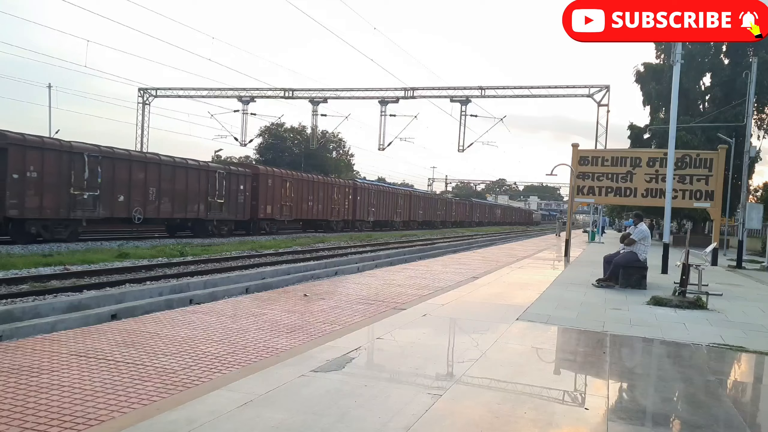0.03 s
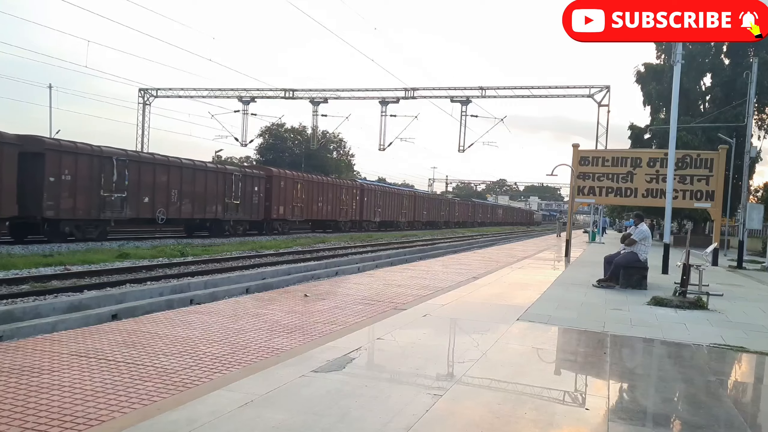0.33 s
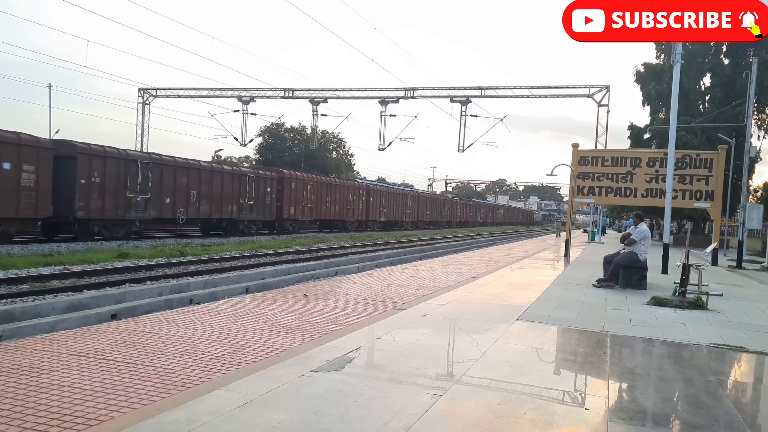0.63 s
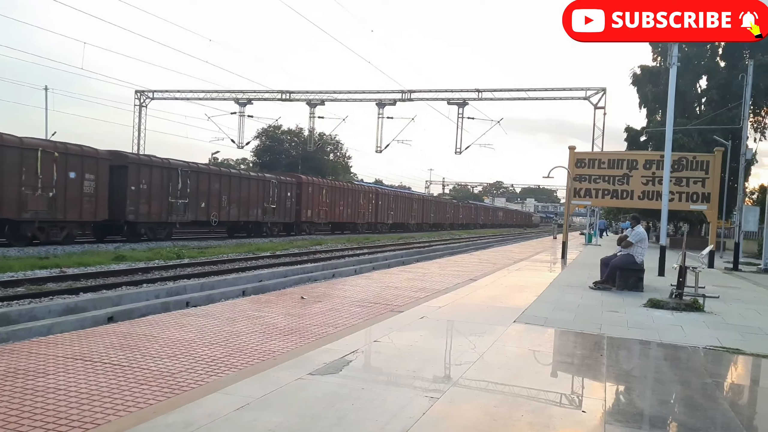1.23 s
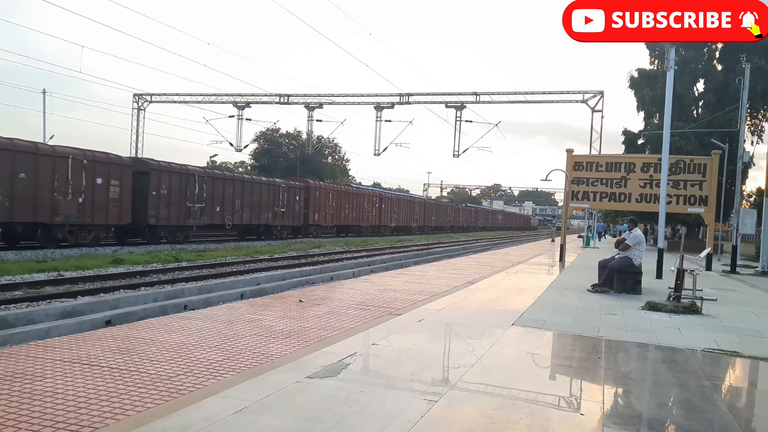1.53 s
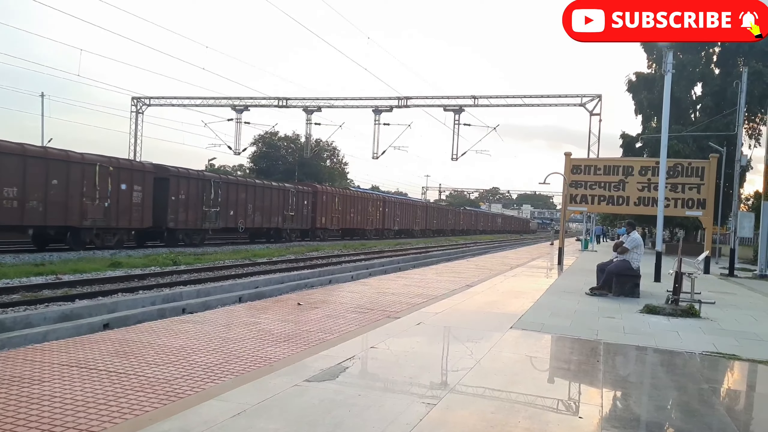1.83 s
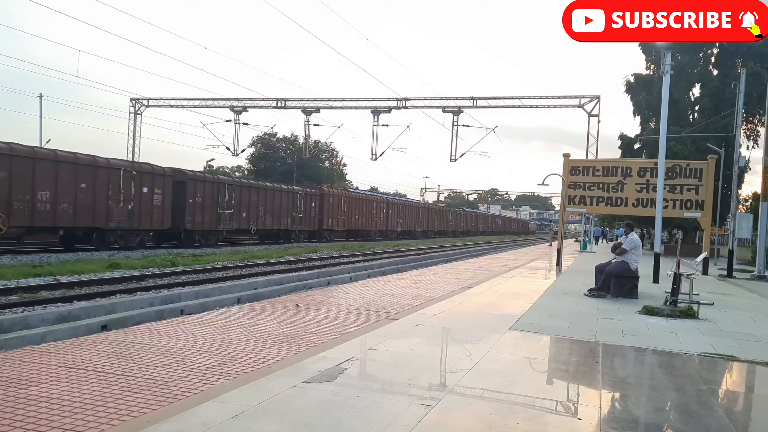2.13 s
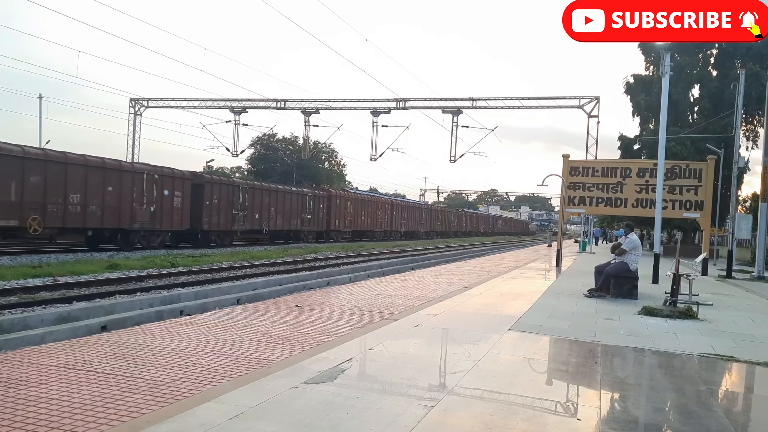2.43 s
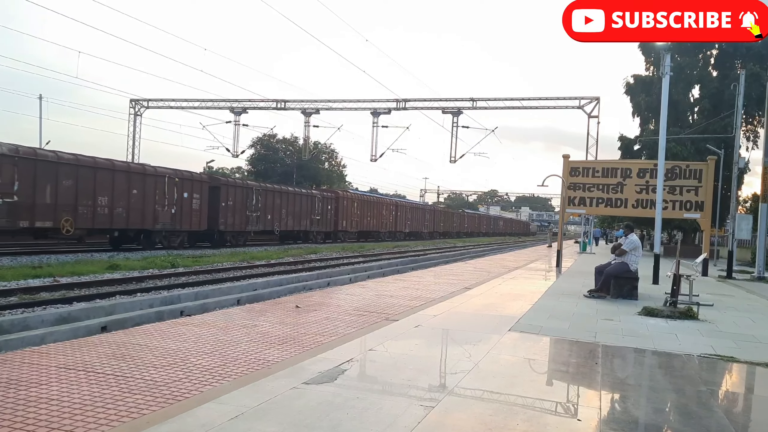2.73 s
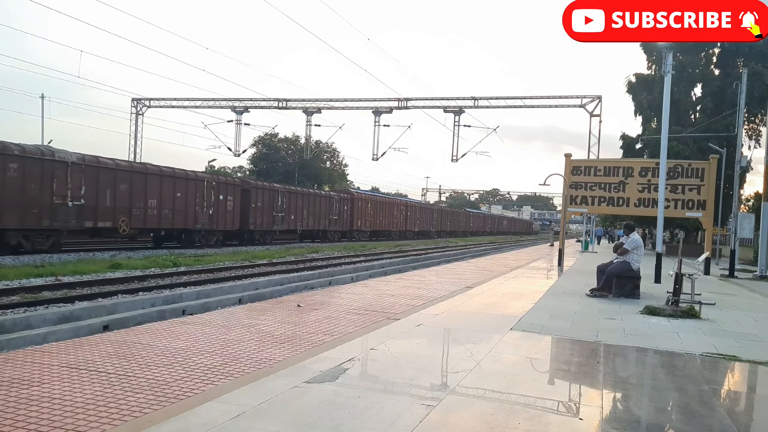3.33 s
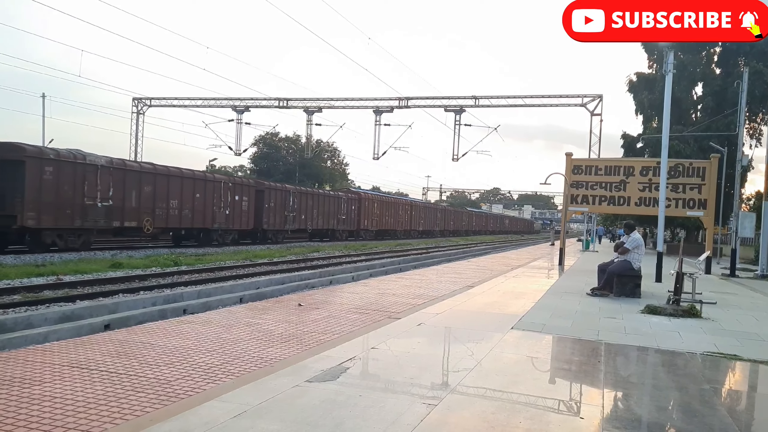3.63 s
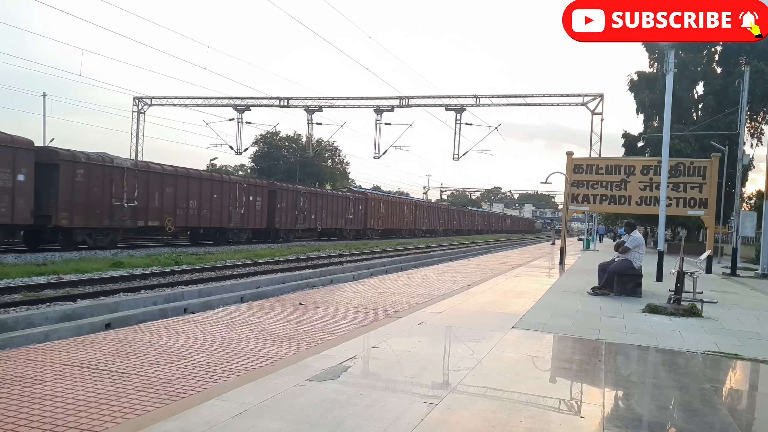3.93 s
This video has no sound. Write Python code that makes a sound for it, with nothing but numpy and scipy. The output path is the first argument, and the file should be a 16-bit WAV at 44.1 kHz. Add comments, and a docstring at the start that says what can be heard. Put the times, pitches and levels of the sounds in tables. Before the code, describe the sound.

Freight wagons roll by on the left with a steady low rumble and soft rail-joint thuds. A harsh, ringing burst of grinding steel opens, with a weaker one around 0.8 seconds and another strong one at 2.8. Couplings clank irregularly from 0.6 seconds on. Brief squeaks come at about 1.2 and 3.4 seconds, then a high, slightly falling wheel squeal from 3.5 to 3.8.

```python
"""Goods wagons passing a platform

Off to the left, wagons roll by over a steady low rumble that thuds as coupling knocks shake the wagon bodies.
Three times steel grinds on steel in a burst of tiny slips that sets a wagon's fittings ringing. Couplings clank
further down the train, steel squeaks, and one wheel gives a short falling squeal."""
import sys
import numpy as np
from scipy import signal
from scipy.fft import rfft, irfft, next_fast_len
from scipy.io import wavfile
from scipy.ndimage import map_coordinates

SR = 44100
rng = np.random.default_rng(int(sys.argv[2]) if len(sys.argv) > 2 else 0)


def to_wav(s):
    """Save 16-bit WAV."""
    ch = np.atleast_2d(s).T  # columns
    pcm = np.round(np.clip(ch, -1, 1) * 32767)  # PCM
    wavfile.write(sys.argv[1], SR, pcm.astype(np.int16))


N = 176400


def amp(db):
    """Decibels to gain."""
    return 10 ** (np.asarray(db) / 20)


def unit(x):
    """Scale to rms 1."""
    return x / np.sqrt(np.mean(x ** 2) + 1e-20)


def along(points, hz):
    """Read (frequency, value) points on a log axis."""
    freqs, values = np.transpose(points)
    return np.interp(np.log(hz + 1), np.log(freqs + 1), values)


def clock():
    """Time of every sample in seconds."""
    return np.arange(N) / SR


def curves(rows):
    """One envelope for each column after the time."""
    times, *columns = np.transpose(rows)
    return [np.interp(clock(), times, column) for column in columns]


def wobble(rate):
    """A smooth random curve, rate knots a second."""
    times = np.linspace(0, N / SR, 4000)
    curve = map_coordinates(rng.standard_normal(1024), [times * rate], mode="wrap")
    return np.interp(clock(), times, curve)


def filtered(x, response):
    """Shape x with a frequency response."""
    size = next_fast_len(N + SR // 4)
    return irfft(rfft(x, size) * response(np.fft.rfftfreq(size, 1 / SR)), size)[..., :N]


def stereo(x, likeness, spectrum, tilt_db=0):
    """Two unrelated signals become a coloured, partly alike left and right of rms 1."""
    width = lambda hz: np.arccos(np.clip(along(likeness, hz), 0, 1)) / 2
    colour = lambda hz: amp(along(spectrum, hz) + tilt_db * np.log2(hz + 1))
    mid, side = filtered(x, lambda hz: colour(hz) * [np.cos(width(hz)), np.sin(width(hz))])
    return unit(np.array([mid + side, mid - side]))


LEFT_LEAD_S, RUMBLE_LEAD_S = 0.0004306, 0.000091
def from_left(x, lead_s):
    """Sound from the left reaches the left microphone port first."""
    return filtered(x, lambda hz: np.exp(1j * np.pi * hz * lead_s * np.array([[1], [-1]])))


def slips(per_s):
    """Two streams of tiny random steel contacts."""
    return unit((rng.random((2, N)) < per_s / SR) * rng.standard_normal((2, N)))


def stroke(start, rise, hold, sag, release):
    """Force of a contact: it builds up, sags while held and lets go (sag and release in dB/s)."""
    t = clock() - start - rise
    attack_db = -28 * np.minimum(t / rise, 0) ** 2
    level_db = attack_db - sag * np.clip(t, 0, hold) - release * np.maximum(t - hold, 0)
    return amp(np.maximum(level_db, -150))


# Reverb decay beside the track (frequency [Hz], T60 [s])
YARD_DECAY = [(200, 1), (2000, 0.39), (8000, 1), (15000, 1)]
def yard(x, wet_db):
    """Mix in the scatter from wagon sides and platform, each frequency dying at its own speed."""
    hz, t, noise = signal.stft(rng.standard_normal((2, SR)), SR, nperseg=256)
    tail = signal.istft(noise * amp(-60 * t / along(YARD_DECAY, hz)[:, None]), SR, nperseg=256)[1]
    echo = signal.fftconvolve(x, tail / np.linalg.norm(tail[0]), axes=1)[:, :N]
    return (x + amp(wet_db) * echo) / np.hypot(1, amp(wet_db))


# Fader ride of the low bed (time [s], level [dB])
RUMBLE_FADER = [(0.0, -33), (0.12, -30.5), (0.58, -32), (1.1, -30.5), (1.76, -27.5), (4.0, -27)]
# Tone of the wagon bodies (frequency [Hz], relative level [dB])
RUMBLE_EQ = [(18, -42), (31, -25), (39, -11.5), (52, 3.5), (75, -1.5), (105, -0.5), (142, -10), (185, -2.5),
             (260, -5.5), (350, -13), (500, -16), (800, -23), (1300, -31), (2500, -68)]
# Stereo image of the rumble (frequency [Hz], left-right likeness [0-1])
RUMBLE_IMAGE = [(60, 0.88), (130, 0.89), (280, 0.91), (650, 0.26)]
def rumble():
    """Low rumble of the wagon bodies, spread along the train; it jumps when a coupling knock shakes a body."""
    level_db, = curves(RUMBLE_FADER)
    level = np.hypot(amp(level_db + 0.88 * wobble(12)), body_thuds())
    return level * stereo(rng.standard_normal((2, N)), RUMBLE_IMAGE, RUMBLE_EQ)


# Fader ride of the wheels (time [s], level [dB])
ROLL_FADER = [(0, -33.5), (.6, -36.5), (1.15, -37), (1.7, -35.5), (2.2, -34), (2.7, -32.5), (3.3, -31.5),
              (3.75, -36.5), (4, -33)]
# Midrange rush of the treads (frequency [Hz], relative level [dB])
ROLL_EQ = [(300, -30), (900, 1), (1400, 2), (1900, 2.5), (2300, 2), (2700, -2), (3150, -8), (4400, -8.5),
           (6200, -12.5), (8200, -13), (9500, -23), (12300, -25), (15500, -39)]
# Bright sizzle of grit (frequency [Hz], relative level [dB])
GRIT_EQ = [(2500, -31), (5000, 5), (7500, -3.5), (9500, -7), (13000, -2), (15500, -19)]
# Stereo image of wheels and couplings (frequency [Hz], left-right likeness [clipped to 0-1])
TRACK_IMAGE = [(60, -4), (280, 5.2), (650, 0.56), (1500, 1), (2600, 0), (4500, 0.17), (12000, 0.2)]
def rolling():
    """The uneven rush of wheels on rails, with swells of grit crushed under the treads."""
    level_db, = curves(ROLL_FADER)
    flutter_db = .9 * wobble(30)
    rush = stereo(rng.standard_normal((2, N)), TRACK_IMAGE, ROLL_EQ)
    grit_db = -20.5 + 2.5 * wobble(11)
    grit = amp(grit_db) * stereo(slips(per_s=1700), TRACK_IMAGE, GRIT_EQ)
    return amp(level_db + flutter_db) * (rush + grit)


MODES_PER_KHZ, MODE_SPREAD_DB = 18, 1.5
def jangle(x, t60):
    """Ring x through a dense random set of steel modes, keeping its energy."""
    hz = np.fft.rfftfreq(SR, 1 / SR)
    chosen = rng.random(len(hz)) < MODES_PER_KHZ / 1000
    gains = chosen * amp(MODE_SPREAD_DB * rng.standard_normal(len(hz)))
    phases = np.exp(2j * np.pi * rng.random((2, len(hz))))
    modes = irfft(gains * phases, SR) * amp(-60 * np.arange(SR) / SR / t60)
    return unit(signal.fftconvolve(x, modes, axes=1)[:, :N]) * np.std(x)


def panel(x, width_hz=95):
    """Every piece of sheet steel has its own broad, damped resonances."""
    knots = rng.standard_normal(1024)
    ripple = lambda hz: np.tanh(map_coordinates(knots, [hz / width_hz], mode="wrap"))
    return filtered(x, lambda hz: amp(3.3 * np.sqrt(2) * ripple(hz)))


DIRECT_HZ, SCATTER_RAD, RING_DB = 4500, .35, 1
def ring(force, modes):
    """Slips under a force pump up the strongest steel modes; each wavers and dies at its own speed."""
    out = np.zeros((2, N))
    for hz, db, t60 in modes:
        retained = amp(-60 / (t60 * SR)) ** 2  # share of energy left after one sample
        swell = np.sqrt(signal.lfilter([1 - retained], [1, -retained], force ** 2, zi=[force[0] ** 2])[0])
        drift, flicker_db = .75 * wobble(60), 2.7 * wobble(55)
        # high modes arrive scattered, from no clear side
        offset = np.pi * LEFT_LEAD_S * min(hz, DIRECT_HZ) + SCATTER_RAD * rng.standard_normal()
        phase = 2 * np.pi * (hz * clock() + rng.random()) + drift
        envelope = swell / swell.max() * amp(db + RING_DB + flicker_db)
        out += envelope * np.sqrt(2) * np.sin(phase + [[offset], [-offset]])
    return out


# Ringing partials of three wagons' fittings (frequency [Hz], relative level [dB], T60 [s])
FIRST_MODES = [(1650, -36, .5), (1863, -31, .45), (2186, -38, .7), (3230, -46, .4), (4124, -30, .33),
               (5911, -44, .4), (6950, -43, .4), (7547, -38, .9), (7881, -32, .6), (8506, -36, .65),
               (8548, -40, .6), (9195, -41, .7), (10850, -39, .85), (11946, -43, .7), (12292, -26, .38),
               (12730, -33, .5), (12852, -32, .52), (14930, -44, .4)]
SECOND_MODES = [(1895, -37, .45), (2239, -40, 1.4), (2271, -41, 1.5), (2589, -43, .9), (4221, -41, .4),
                (4490, -39, .8), (7730, -47, .4), (12258, -49, 1.2), (12520, -46, 1), (13491, -48, .6),
                (14826, -45, .45)]
THIRD_MODES = [(1390, -41, .4), (1620, -29.5, .35), (1906, -24.5, .6), (2052, -28.5, .25), (2567, -28.5, 1),
               (3332, -42, .5), (4194, -29, .4), (4485, -33, .4), (4850, -43, .3), (5814, -40, .3),
               (5975, -34, .45), (7122, -43, .4), (7655, -37, .6), (7686, -39, .6), (8791, -42, 1.4),
               (9535, -42, 1.3), (12467, -38, .5), (12511, -35, .5), (13189, -37, .65), (13660, -46, .9),
               (14567, -34, .4), (15315, -36, .35)]
# Harsh edge of steel on steel (frequency [Hz], relative level [dB])
GRIND_EQ = [(300, -39), (900, -1), (1200, -14.5), (1550, -2), (1950, 10), (2400, 2), (2800, -2.5),
            (3080, -9), (3350, 4), (3800, -7), (4200, 1), (5000, -6), (6000, 0), (6900, -6.5), (7900, 1),
            (9700, -7), (11300, -6), (12500, 1), (15200, -7), (16000, -33)]
# Stereo image of the grinding (frequency [Hz], left-right likeness [0-1])
GRIND_IMAGE = [(600, 1), (1500, 0.19), (4000, 0.85), (5500, 0.088), (9000, 0.24), (13000, 0.15)]
# Grinding cues (time [s], rise [s], hold [s], sag [dB/s], release [dB/s], crunch gain [dB],
# treble tilt [dB/octave], left minus right [dB], partials [table])
GRIND_CUES = [(-.03, 0.024, 0.28, 28.5, 173, -16.5, 0.84, 1.5, FIRST_MODES),
              (0.678, 0.16, 0.0059, 5, 174, -25, -0.76, 0.5, SECOND_MODES),
              (2.76, 0.019, 0.15, 31, 220, -17, -0.3, -0.5, THIRD_MODES)]
def grinding():
    """Each burst is a dense crunch of slips; the steelwork jangles and its strongest modes stand out."""
    out = np.zeros((2, N))
    for start, rise, hold, sag, release, db, tilt_db, pan_db, modes in GRIND_CUES:
        force = stroke(start, rise, hold, sag, release)
        judder_db = 1.9 * wobble(75)
        rub = force * amp(judder_db) * unit(slips(per_s=3000) + .5 * rng.standard_normal((2, N)))
        steel = amp(-.3) * yard(rub, wet_db=-11) + jangle(rub, t60=0.6)
        coloured = stereo(panel(steel), GRIND_IMAGE, GRIND_EQ, tilt_db)
        crunch = amp(db) * np.std(steel) * from_left(coloured, LEFT_LEAD_S)
        out += (crunch + ring(force, modes)) * amp(pan_db * np.array([[.5], [-.5]]))
    return out


# Tone of the couplings (frequency [Hz], relative level [dB])
CLANK_EQ = [(250, -20), (700, -9.5), (1200, -1), (1700, -2), (2100, 2), (2700, 3), (3150, -5.5),
            (4400, -8.5), (8000, -7), (9700, -14.5), (12500, -16), (15500, -24)]
# Clank cues (time [s], rise [s], hold [s], level [dB], treble tilt [dB/octave])
CLANK_CUES = [(0.612, 0.021, 0.014, -28.5, -2.5), (1.235, 0.013, 0.064, -33, 0),
              (1.364, 0.0083, 0.043, -32.5, -4), (1.785, 0.02, 0.046, -30.5, -3.5),
              (1.894, 0.0099, 0.02, -32, -3.5), (1.96, 0.01, .04, -36.5, -3), (2.099, 0.012, 0.04, -27, -2),
              (2.211, 0.0095, 0.029, -28, -4.5), (2.393, 0.02, 0.032, -33, -2.5),
              (2.506, 0.012, 0.068, -33, -3), (2.764, 0.0086, 0.023, -21, -5),
              (3.196, 0.011, 0.051, -32.5, 3.5), (3.325, 0.016, 0.04, -26.5, 0.5),
              (3.429, 0.016, 0.081, -29, -1), (3.62, 0.015, 0.022, -34, -2),
              (3.864, 0.022, 0.057, -28.5, -2.5), (3.974, .012, 0.038, -30, 2)]
def clanks():
    """Slack couplings scrape and rattle further down the train; each rings briefly with its own modes."""
    out = np.zeros((2, N))
    for start, rise, hold, db, tilt_db in CLANK_CUES:
        force = stroke(start, rise, hold, sag=17, release=348)
        chatter = force * amp(3 * wobble(110))
        rattle = chatter * (slips(per_s=700) + 0.6 * rng.standard_normal((2, N)))
        steel = rattle + amp(5) * jangle(rattle, t60=0.071)
        out += amp(db) * np.std(force) * stereo(steel, TRACK_IMAGE, CLANK_EQ, tilt_db)
    return yard(out, wet_db=-2.5)


# Body thud cues (time [s], level [dB])
THUD_CUES = [(0.724, -31.5), (1.245, -33), (2.105, -30), (3.246, -30), (3.875, -24.5)]
def body_thuds():
    """Envelope of the jolts given to the rumble as coupling knocks shake the wagon bodies."""
    return sum(amp(db) * stroke(start, rise=.015, hold=0.028, sag=0, release=248)
               for start, db in THUD_CUES)


# Squeak cues (time [s], length [s], pitch [Hz], level [dB])
SQUEAK_CUES = [(1.106, 0.19, 2266, -40), (1.26, .1, 1338, -29.5), (1.317, 0.016, 5020, -41.5),
               (1.37, 0.03, 4970, -42), (3.36, .07, 1420, -29), (3.45, 0.11, 4890, -44)]
def squeaks():
    """Brief steel squeaks, each a wavering tone that swells and fades."""
    out = np.zeros(N)
    for start, length, hz, db in SQUEAK_CUES:
        arch = np.sin(np.pi * np.clip((clock() - start) / length, 0, 1))
        out += amp(db) * arch * np.sin(2 * np.pi * hz * clock() + 0.79 * wobble(110))
    return np.sqrt(2) * out


# Pitch and fader ride of the squealing wheel (time [s], pitch [Hz], level [dB])
SQUEAL_CURVE = [(3.5, 4500, -54), (3.555, 4550, -30.5), (3.585, 4490, -30.5), (3.6, 4500, -39),
                (3.618, 4500, -33), (3.622, 4485, -28), (3.68, 4450, -31), (3.73, 4453, -30.5),
                (3.775, 4425, -36), (3.82, 4420, -49), (4, 4390, -48)]
def squeal(jitter_hz=39, octave_db=-27.5):
    """A flange rubs the rail: one unsteady wheel mode and its weak octave."""
    hz, db = curves(SQUEAL_CURVE)
    phase = 2 * np.pi * np.cumsum(hz + jitter_hz * wobble(260)) / SR
    flicker_db = 2.4 * wobble(130)
    envelope = amp(db + flicker_db) * (clock() > SQUEAL_CURVE[0][0])
    return envelope * np.sqrt(2) * (np.sin(phase) + amp(octave_db) * np.sin(2 * phase))


def scene():
    """The train is off to the left of the microphone."""
    bed = from_left(rumble(), RUMBLE_LEAD_S)
    bursts = grinding()
    running_gear = rolling() + clanks()
    tones = squeal() + squeaks()
    running_gear += yard(np.array([tones, tones]), wet_db=-9)
    return bed + bursts + from_left(running_gear, LEFT_LEAD_S)


# Colour difference of the microphone ports (frequency [Hz], left minus right [dB])
PORT_BALANCE = [(50, 1.8), (800, 2.5), (1550, -0.5), (1950, -4.5), (2800, -2), (4000, 0), (5200, -2),
                (6800, 0.5), (8000, 7.5), (9200, -0.5), (10200, -9), (12500, -5.5), (15000, -2.5)]
CEILING, TOP_HZ = .9, 15600
def record(dry):
    """The two ports colour the sound differently; peaks are rounded off and the top treble is cut."""
    coloured = filtered(dry, lambda hz: amp(along(PORT_BALANCE, hz) * np.array([[.5], [-.5]])))
    rounded = coloured / (1 + np.abs(coloured / CEILING) ** 6) ** (1 / 6)
    return filtered(rounded, lambda hz: hz < TOP_HZ)


dry = scene()
out = record(dry)
to_wav(out)
```